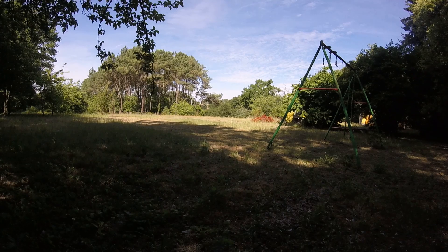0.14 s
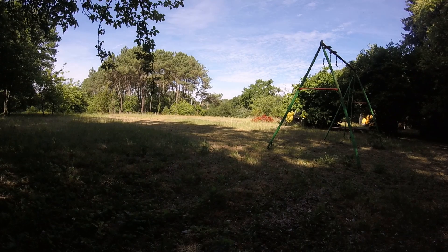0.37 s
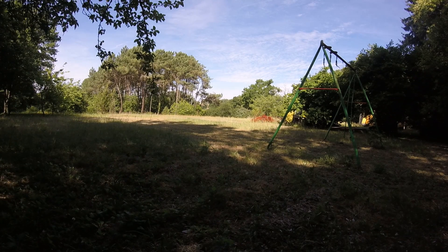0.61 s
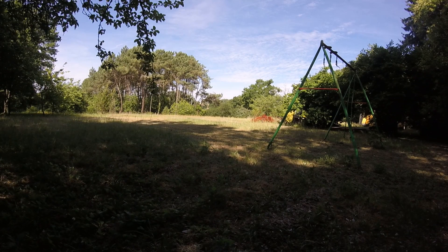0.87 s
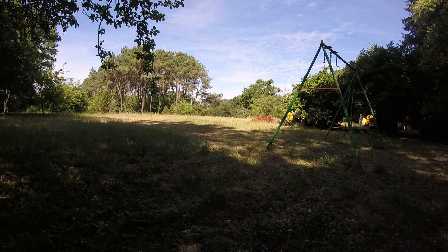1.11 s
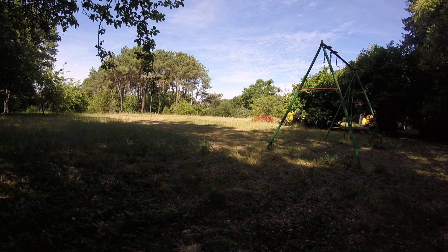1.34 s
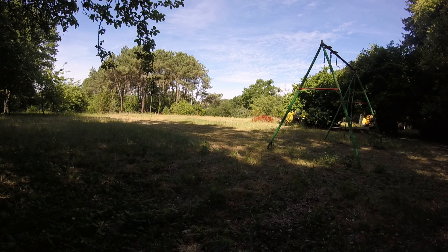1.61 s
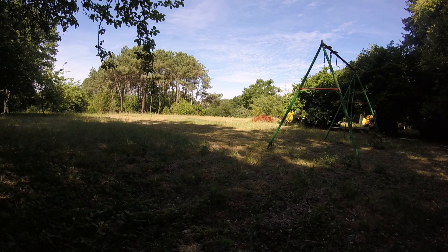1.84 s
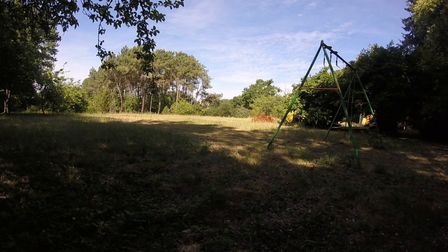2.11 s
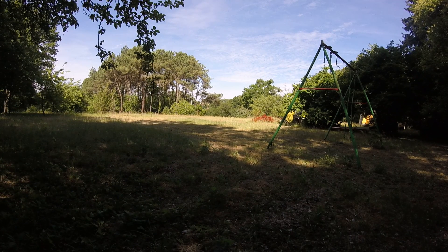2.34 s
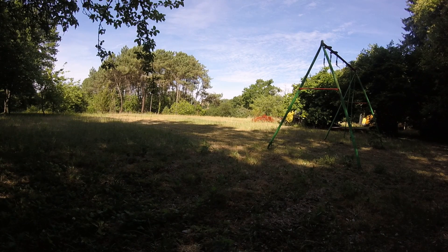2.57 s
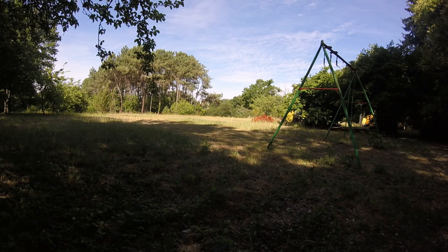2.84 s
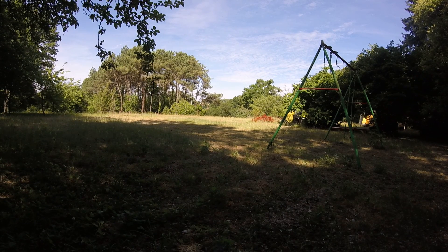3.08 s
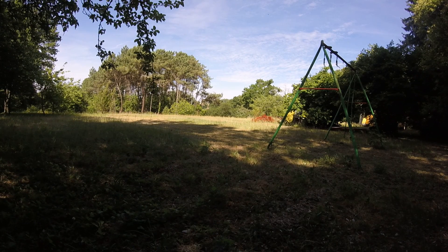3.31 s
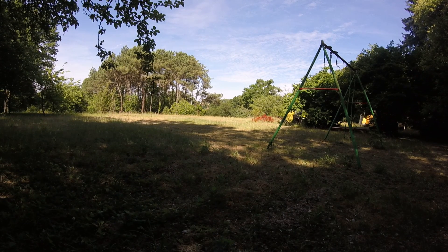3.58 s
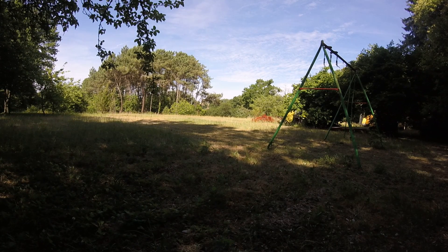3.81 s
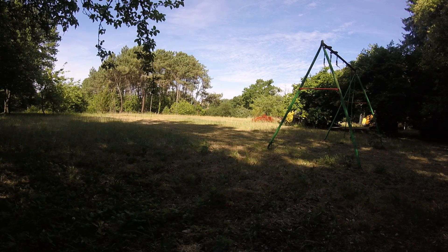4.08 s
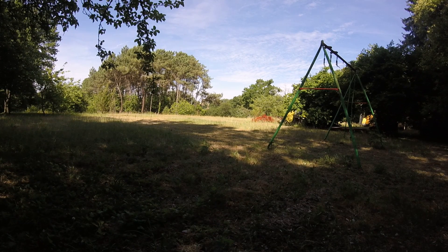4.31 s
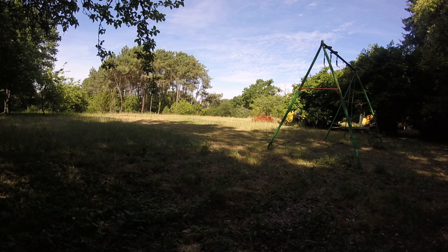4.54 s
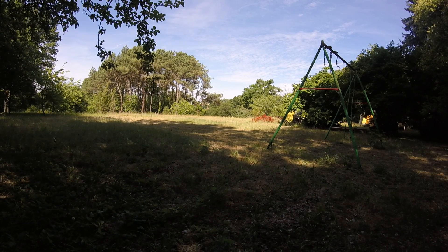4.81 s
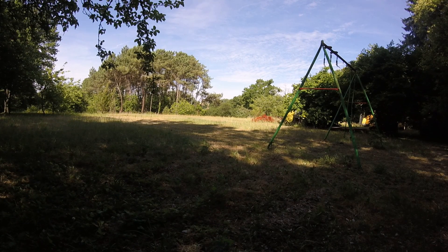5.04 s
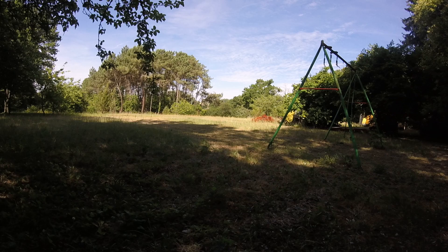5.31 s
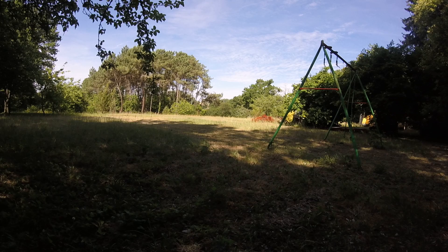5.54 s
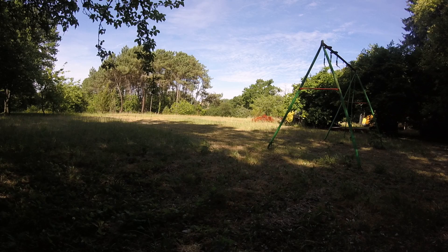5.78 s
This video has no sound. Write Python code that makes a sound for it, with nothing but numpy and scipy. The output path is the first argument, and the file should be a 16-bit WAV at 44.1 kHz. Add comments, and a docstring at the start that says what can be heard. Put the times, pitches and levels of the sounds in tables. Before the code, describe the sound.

A tiny silence, then from about 0.04 s a finger rubs the camera casing with a soft low push of air. At 0.17 s comes a very loud, dry, bright plastic snap, really a tight cluster of clicks with a short springy buzz, followed by a small dull return tick near 0.23 s. The automatic gain drops the background, which climbs back by roughly 1 s. What remains is a distant petrol mower across an open lawn: a low, buzzing hum at about 25 firings a second, a midrange metallic rattle fluttering with each cycle, thin faint whines, and broad soft blade wash with hiss. Speed stays nearly constant, wavering minutely. The treble brightens briefly around 1.05 s; the rattle recedes slowly from 2.5 s, is weakest near 3.8 s, then swells back by 4.8 s and continues steadily until about 6 s. Open air, little reverberation.

```python
"""Far across a lawn a single-cylinder petrol mower runs at governed speed, heard by a small camera.
Exhaust orders and engine rocking are sines locked to the firing; thin whines are higher orders. Knocks and
noise drive a bank of resonances as a rattle, over shaped noise for blade wash, leaves and hiss.
At the start a finger rubs (noise) and presses the camera's button, whose snaps strike decaying case modes;
the gain control ducks and takes most of a second to recover."""
import sys
import numpy as np
from scipy import signal
from scipy.fft import rfft, irfft, next_fast_len
from scipy.io import wavfile
from scipy.ndimage import minimum_filter1d

SR = 44100
rng = np.random.default_rng(int(sys.argv[2]) if len(sys.argv) > 2 else 0)


def output_pcm(signal):
    """Save a mono or channel-first signal as 16-bit PCM at the path in sys.argv[1].

    Samples are clipped to [-1, 1] before scaling.
    """
    pcm = np.clip(np.atleast_2d(signal).T, -1, 1) * 32767
    wavfile.write(sys.argv[1], SR, np.round(pcm).astype(np.int16))


def gain_from_decibels(decibels):
    """Convert decibel values to linear amplitude factors."""
    exponent = np.asarray(decibels, float) / 20
    return 10 ** exponent


N = 260631
TIME_S = np.arange(N) / SR

# Governor hunting. Each row: time in seconds, firings per second.
FIRING_RATE = [(.5, 24.74), (.8, 24.78), (1.3, 24.725), (1.7, 24.76), (2.25, 24.66), (2.9, 24.7),
               (3.3, 24.77), (3.85, 24.68), (4.4, 24.69), (4.95, 24.765), (5.3, 24.74), (5.6, 24.67),
               (5.9, 24.72)]
FIRING_S = 2.982   # one moment of firing
# Exhaust hum. Each row: multiple of the firing rate, level in dB rms.
EXHAUST_ORDERS = [(5, -55.5), (6, -60.5), (7, -70), (8, -61), (9, -67), (10, -68.5)]
# Engine rocking on the deck. Each row: multiple of the firing rate, level in dB rms.
ROCKING_ORDERS = [(1, -89), (2, -66.5), (3, -66.5), (4, -74)]
ROCKING_LAG_CYCLES = .08
# Valve-gear knocks in one cycle. Each row: share of the cycle after firing, relative level in dB.
VALVE_KNOCKS = [(0.241, -3.5), (.41, -3), (0.62, -6), (.76, -2.5), (0.901, -23), (0.968, -5.5)]
# Resonances that colour the rattle. Each row: frequency in Hz, width in Hz, relative level in dB.
RATTLE_MODES = [(460, 68, -33.5), (1312, 115, -14.5), (1527, 96, 0.5), (1660, 81, -14.5), (1970, 223, -9),
                (2085, 48, -3.5), (2190, 55, -6.5), (2646, 130, -17), (3280, 82, -8.5), (3390, 29, -9),
                (3525, 190, -13.5), (3853, 130, -15), (4180, 89, -13), (4360, 266, -15), (6300, 220, -27),
                (7670, 950, -31)]
RATTLE_SPLIT_HZ = 2400
# Swell and fade of the rattle in the air over the lawn.
# Each row: time in seconds, level of the modes below the split in dB rms.
CARRY_LEVEL = [(.25, -55.5), (.42, -54), (.49, -52), (.62, -51), (.85, -51.5), (1.1, -52), (1.4, -51.5),
               (1.8, -52.5), (2.5, -53), (3, -55), (3.8, -56), (4.2, -55), (4.8, -52.5), (5.9, -52.5)]
UPPER_RATTLE_DB, UPPER_FOLLOWS = -59, 0.81   # modes above the split: mean level, share of the swell
# The treble brightens briefly: rattle gain in dB per octave above the split.
BRIGHT_S, BRIGHT_SPREAD_S, BRIGHT_DB_PER_OCTAVE = 1.05, 0.14, 3.5
# Thin whines of rotating parts. Each row: multiple of the firing rate, level in dB rms.
WHINE_ORDERS = [(44, -77), (52, -80), (56, -74), (60, -69), (62, -66), (66, -67), (69, -75), (75, -77),
                (79, -75)]
# Button snaps and bounces. Each row: time in seconds, level in dB.
BUTTON_SNAPS = [(.17383, -27), (.17426, -3), (.17463, -3.5), (.17626, -16.5), (.1852, -31), (.1955, -41)]
# Camera case modes. Each row: frequency in Hz, relative level in dB, 60 dB decay time in seconds.
CASE_MODES = [(92, -28, 0.13), (147, -28.5, 0.18), (170, -27, 0.082), (483, -18, 0.03), (1040, -19, 0.05),
              (1525, 4, 0.018), (2030, -11, 0.03), (2140, -36, 0.14), (2543, -4, 0.0123),
              (3231, 8.5, 0.0102), (3934, 12, 0.0089), (4596, -16, 0.02), (5850, 6.5, 0.0011),
              (6429, 7.5, 0.0045), (7677, -19, 0.012), (8936, -16, 0.0038), (9100, 5, 0.0005),
              (10887, -8.5, 0.0012), (13208, -7, 0.0015), (13004, -7.5, 0.0032)]
BOUNCE_DULLS = 60   # dB lost per octave above 2 kHz per second after the first snap
SPRING_DB, SPRING_T60_S, SPRING_END_S = -17, 0.06, .198
SPRING_HZ, SPRING_WIDTH_HZ, SPRING_SING_DB = 6100, 250, 14   # pitch that sings out of the buzz
RETURN_S, RETURN_DB, RETURN_HZ, RETURN_WIDTH_HZ = .2272, -14, 3000, 750   # width of each of two passes
# Skin and spring on plastic. Each row: frequency in Hz, relative level in dB per Hz.
RUB_COLOUR = [(400, -7.5), (1000, -12.5), (1600, -4.5), (2400, 0.5), (4200, -9.5), (5200, -17.5),
              (6200, -25), (6900, -27.5), (7700, -18.5), (9000, -29.5), (13000, -49.5)]
# Finger strokes on the case. Each row: start, peak and end in seconds, level in dB.
FINGER_STROKES = [(0.029, 0.051, 0.12, -31), (0.095, 0.146, 0.2, -36.5)]
STROKE_CURVE = 1.8   # power of the straight rise and fall
PUSH_S, PUSH_DB, PUSH_HZ = .052, -15.5, 50
# Blade wash, leaves and microphone hiss. Each row: frequency in Hz, relative level in dB per Hz.
WASH_COLOUR = [(6, -13), (20, -7), (40, 5), (90, -1), (130, 1.5), (200, 1.5), (300, -2.5), (600, -6),
               (1100, -7), (2400, -10), (3000, -13), (5000, -17), (7000, -24), (9500, -30), (12000, -34),
               (15500, -40.5)]
WASH_DB = -54
START_S = .042


def rms_one(x):
    """Scale to rms 1."""
    return x / np.sqrt(np.mean(x ** 2) + 1e-20)


def in_time(rows):
    """Interpolate a curve to one value a sample."""
    time_s, value = np.transpose(rows)
    return np.interp(TIME_S, time_s, value)


def drift(rate_hz):
    """Slow random wander of rms 1: noise through a double pole, run at every 40th sample."""
    r = np.exp(-80 * np.pi * rate_hz / SR)
    noise = rng.standard_normal(N // 40 + 2002)
    slow = rms_one(signal.lfilter([1], [1, -2 * r, r * r], noise)[2000:])
    return np.interp(np.arange(N) / 40, np.arange(len(slow)), slow)


def coloured_noise(spectrum):
    """White noise shaped by a spectrum; rms 1."""
    size = next_fast_len(N)
    hz = np.arange(1, size // 2 + 2) * SR / size
    point_hz, point_db = np.transpose(spectrum)
    shape = gain_from_decibels(np.interp(np.log(hz), np.log(point_hz), point_db, left=-60))
    return rms_one(irfft(rfft(rng.standard_normal(size)) * shape, size)[:N])


def resonance(x, hz, width_hz):
    """Two-pole band-pass, gain 1 on top."""
    r = np.exp(-np.pi * width_hz / SR)
    poles = [1, -2 * r * np.cos(2 * np.pi * hz / SR), r * r]
    return signal.lfilter(np.array([1, 0, -1]) * (1 - r * r) / 2, poles, x)


def carry_swing_db():
    """Swell of the rattle in the air over the lawn, about its mean."""
    carry_db = in_time(CARRY_LEVEL)
    return carry_db - carry_db.mean()


def brightening():
    """One brief bell-shaped rise from 0 to 1 and back."""
    return np.exp(-((TIME_S - BRIGHT_S) / BRIGHT_SPREAD_S) ** 2)


def engine_cycles():
    """Running count of engine cycles, zero at one firing: the firing rate summed over time."""
    count = np.cumsum(in_time(FIRING_RATE)) / SR
    return count - count[round(FIRING_S * SR)]


def orders(cycle, table, waver_db, fast_db, slip=0):
    """Sines in step at each firing; each wavers on its own and may slip in phase, high orders most."""
    out = np.zeros(N)
    for order, level_db in table:
        gain = gain_from_decibels(level_db + waver_db * drift(0.63) + fast_db * drift(11.0))
        phase = 2 * np.pi * order * cycle + slip * order ** 2 * drift(1.2)
        out += np.sqrt(2) * gain * np.cos(phase)
    return out


def exhaust(cycle):
    """Exhaust pulses repeat with the firing, so they sound as its harmonics."""
    return orders(cycle, EXHAUST_ORDERS, waver_db=.6, fast_db=.8, slip=.004)


def rocking(cycle):
    """The engine rocks on the deck a little after each firing, in its lowest orders."""
    return orders(cycle - ROCKING_LAG_CYCLES, ROCKING_ORDERS, waver_db=1.5, fast_db=1.5)


def valve_knocks(cycle, uneven_db):
    """Valve-gear impulses looped every cycle, slightly uneven in time and level."""
    knocks = np.zeros(N)
    whole = np.arange(np.ceil(cycle[0]), cycle[-1] - 1)
    for share, level_db in VALVE_KNOCKS:
        at = np.interp(whole + share, cycle, np.arange(N))
        at += 2.1 * rng.standard_normal(len(whole))   # samples
        knocks[at.astype(int)] = gain_from_decibels(level_db + uneven_db * rng.standard_normal(len(whole)))
    return knocks


def rattle(cycle, knock_db, uneven_db, gate):
    """Knocks, and noise that swells with them, drive the resonances that colour the rattle."""
    knocks = valve_knocks(cycle, uneven_db)
    swell = rms_one(signal.lfilter([1], [1, -.99], knocks))
    drive = gain_from_decibels(knock_db) * rms_one(knocks) + rng.standard_normal(N) * (1 + gate * swell)
    low, high = np.zeros(N), np.zeros(N)
    bright_db = BRIGHT_DB_PER_OCTAVE * brightening()
    for k, (hz, width_hz, level_db) in enumerate(RATTLE_MODES):
        # two wider passes together give about the listed width, with dark valleys between modes
        ring = resonance(resonance(drive, hz, 1.7 * width_hz), hz, 1.7 * width_hz)
        ring = (-1) ** k * ring * gain_from_decibels(level_db + 1.0 * drift(3) + .8 * drift(14))
        if hz < RATTLE_SPLIT_HZ:
            low += ring
        else:
            high += ring * gain_from_decibels(bright_db * np.log2(hz / RATTLE_SPLIT_HZ))
    low_db = in_time(CARRY_LEVEL)
    high_db = UPPER_RATTLE_DB + UPPER_FOLLOWS * carry_swing_db()
    return gain_from_decibels(low_db) * rms_one(low) + gain_from_decibels(high_db) * rms_one(high)


def whines(cycle):
    """Rotating parts sing in high orders, carried like the rattle but swelling further."""
    return gain_from_decibels(1.7 * carry_swing_db()) * orders(cycle, WHINE_ORDERS, waver_db=4.5, fast_db=1.0)


def case_snaps():
    """Every snap strikes all modes of the case; later ones are duller."""
    out, short = np.zeros(N), SR // 2
    snap_s, snap_db = np.transpose(BUTTON_SNAPS)
    at = np.round(snap_s * SR).astype(int)
    late_s = snap_s - snap_s[0]
    for k, (hz, level_db, t60_s) in enumerate(CASE_MODES):
        dulled_db = BOUNCE_DULLS * late_s * max(np.log2(hz / 2000), 0)
        clicks = np.zeros(short)
        clicks[at] = gain_from_decibels(snap_db + level_db - dulled_db + rng.normal(0, .4, len(at)))
        r, w = gain_from_decibels(-60 / (t60_s * SR)), 2 * np.pi * hz / SR
        poles = [1, -2 * r * np.cos(w), r * r]
        out[:short] += (-1) ** k * signal.lfilter([0, np.sin(w)], poles, clicks + 1e-18)
    return out


def spring_buzz():
    """The spring buzzes on, decaying with one singing pitch, and is cut off at SPRING_END_S."""
    since_s = np.maximum(TIME_S - BUTTON_SNAPS[1][0], 0)
    buzz = coloured_noise(RUB_COLOUR)
    buzz = buzz + gain_from_decibels(SPRING_SING_DB) * resonance(buzz, SPRING_HZ, SPRING_WIDTH_HZ)
    decay = gain_from_decibels(SPRING_DB - 60 * since_s / SPRING_T60_S)
    return buzz * decay * (since_s > 0) * (TIME_S < SPRING_END_S)


def return_tick():
    """The button springs back with a small dull tick: an impulse through one resonance twice."""
    tick = gain_from_decibels(RETURN_DB) * (np.arange(N) == round(RETURN_S * SR)) + 1e-18
    once = resonance(tick, RETURN_HZ, RETURN_WIDTH_HZ)
    return resonance(once, RETURN_HZ, RETURN_WIDTH_HZ)


def button():
    """Snaps, spring and return, low-passed because the contact is not quite instant."""
    contact = signal.butter(3, 9500, fs=SR, output="sos")
    return signal.sosfilt(contact, case_snaps() + spring_buzz() + return_tick())


def finger():
    """Skin drags in small jerks on the case and pushes the air at the microphone once."""
    pressure = np.zeros(N)
    for start_s, peak_s, end_s, level_db in FINGER_STROKES:
        stroke = np.interp(TIME_S, [start_s, peak_s, end_s], [0, 1, 0])
        pressure += gain_from_decibels(level_db) * stroke ** STROKE_CURVE
    jerks = gain_from_decibels(2.2 * drift(150))
    rub = pressure * jerks * coloured_noise(RUB_COLOUR) * (TIME_S < .174)
    push = -np.exp(-np.abs(TIME_S - PUSH_S) * 2 * np.pi * PUSH_HZ)
    push = signal.lfilter(*signal.butter(2, 6, "high", fs=SR), push)
    return rub + gain_from_decibels(PUSH_DB) * push


def wash():
    """Blade wash, leaves and hiss as shaped noise; it swells a little and brightens with the rattle."""
    noise = gain_from_decibels(WASH_DB + .4 * drift(2.5)) * coloured_noise(WASH_COLOUR)
    noise *= gain_from_decibels(0.32 * carry_swing_db())
    treble = signal.lfilter(*signal.butter(2, 5500, "high", fs=SR), noise)
    return noise + 0.35 * brightening() * treble


def scene():
    """Mower, the hand on the camera, and lawn."""
    cycle = engine_cycles()
    mower = exhaust(cycle) + rocking(cycle) + whines(cycle)
    mower += rattle(cycle, knock_db=-4, uneven_db=2.5, gate=.25)
    return (mower + button() + finger() + wash())[None]


def gain_control(x, threshold_db, slope, most_db, hold_s, release_db_per_s):
    """Loud peaks duck the gain; it holds, then climbs back at a steady rate."""
    over_db = 20 * np.log10(np.abs(x) + 1e-9) - threshold_db
    duck_db = np.clip(slope * over_db, 0, most_db)
    hold = round(hold_s * SR)
    duck_db = -minimum_filter1d(-duck_db, size=hold, origin=(hold - 1) // 2)   # holds past peaks
    ramp_db = release_db_per_s * TIME_S
    duck_db = np.maximum.accumulate(duck_db + ramp_db) - ramp_db
    return x * gain_from_decibels(-signal.lfilter([.004], [1, -.996], duck_db))


def low_pass(x):
    """Removes everything above the highest recorded frequency."""
    return signal.sosfilt(signal.butter(12, 15250, fs=SR, output="sos"), x)


def record(dry):
    """Gain control, a soft ceiling, then a short fade-in after silence."""
    x = gain_control(dry[0], threshold_db=-35.5, slope=0.95, most_db=10.5,
                     hold_s=0.24, release_db_per_s=19.5)
    x = .93 * np.tanh(x / .93 + (x / .93) ** 3 / 3)   # only the highest peaks are rounded
    fade = np.clip((TIME_S - START_S) / .003, 0, 1)
    return low_pass((x * fade ** 2)[None])


dry = scene()
out = record(dry)
output_pcm(out)
```